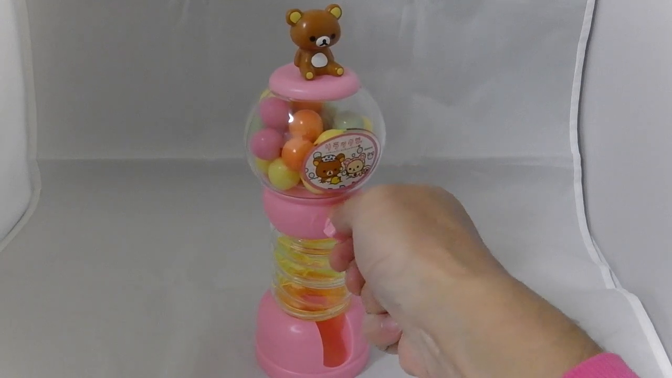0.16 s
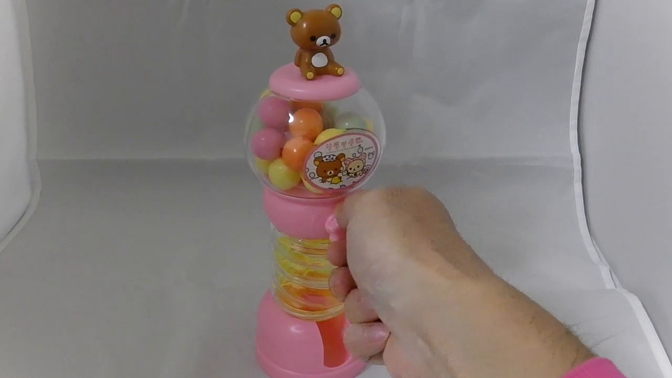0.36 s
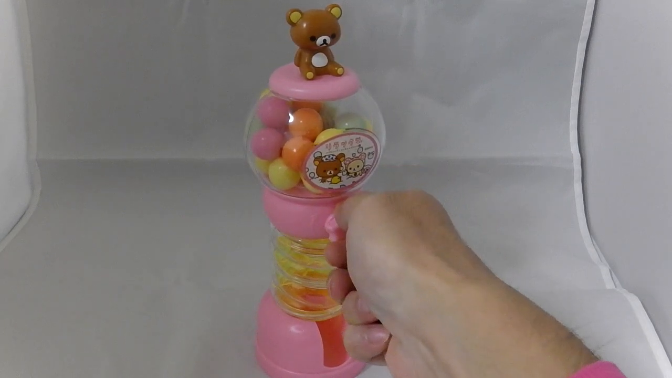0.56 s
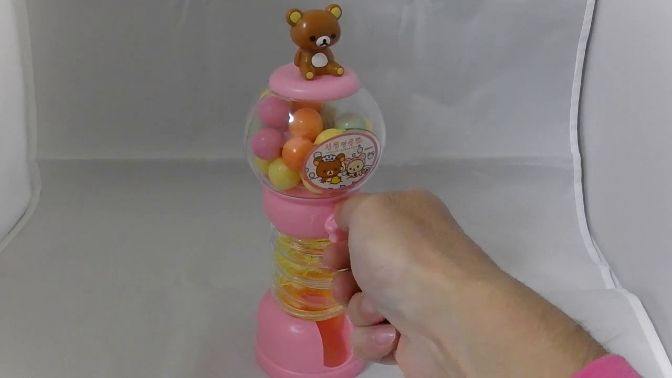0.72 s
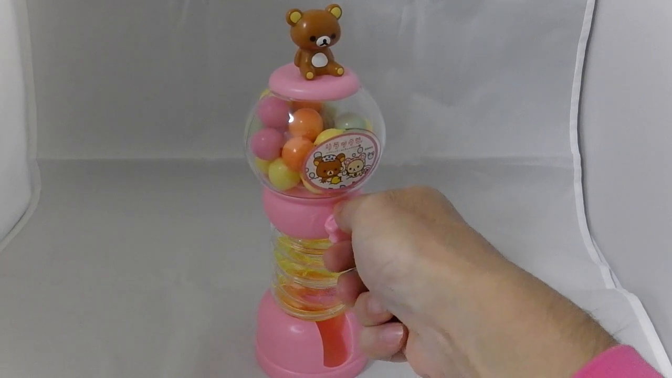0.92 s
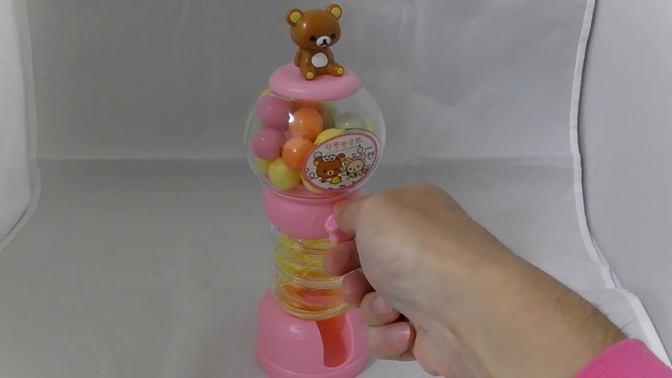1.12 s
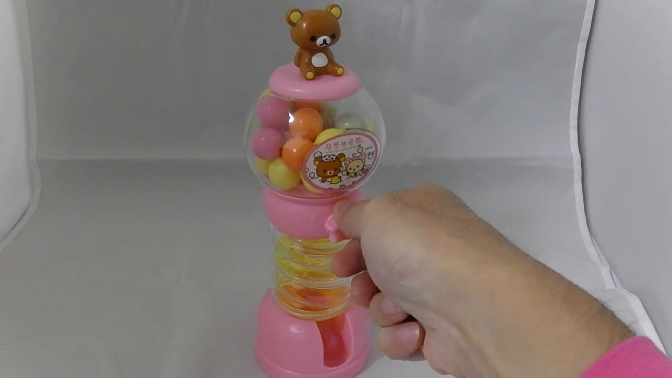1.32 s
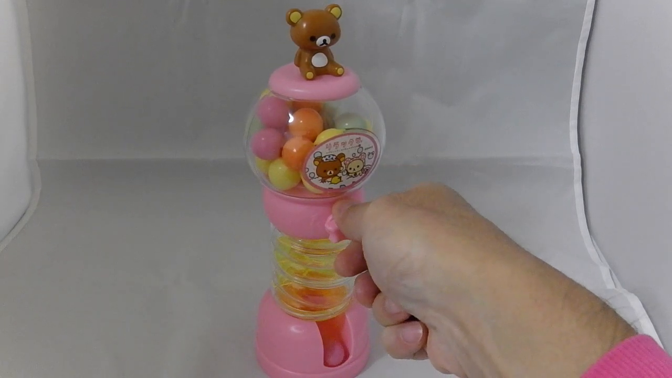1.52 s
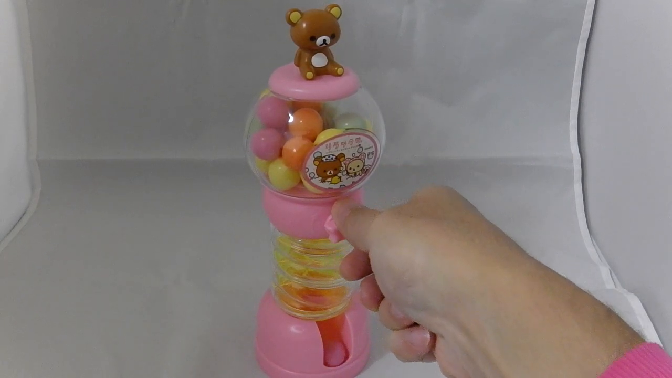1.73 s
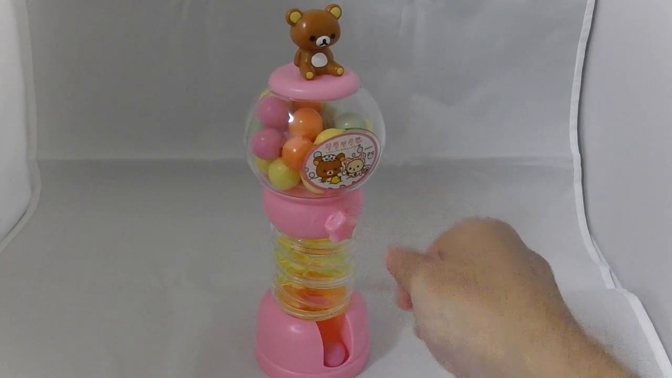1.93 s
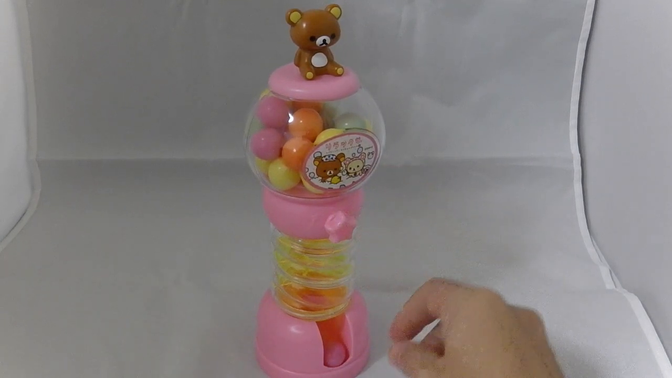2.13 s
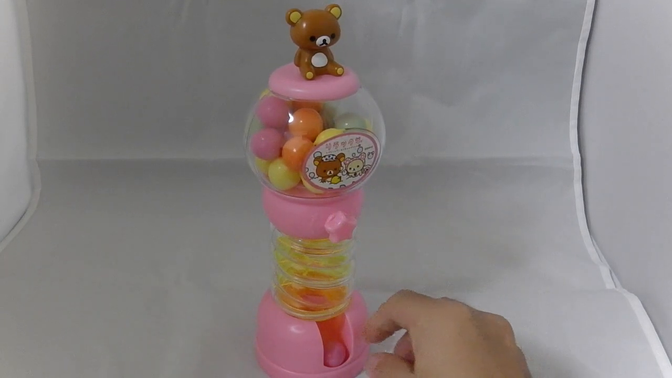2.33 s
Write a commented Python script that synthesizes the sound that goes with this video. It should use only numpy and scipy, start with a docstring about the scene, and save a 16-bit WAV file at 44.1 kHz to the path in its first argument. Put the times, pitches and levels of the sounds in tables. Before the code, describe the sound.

Hard plastic knob ratchets with loud clacks, then a small ball rattles down a hollow chute

```python
"""A hand turns the knob of a small plastic gumball toy on a table: ratchet and balls knock, then a ball
rolls rattling down the spiral chute and bounces out in the tray. Contact clicks ring the hollow base and
shell, crack in damped high bands and make the table top hum. Close walls answer with short echoes over
room tone and microphone noise. The recorder splits near 4 kHz and passes the lower part about 21 ms late."""
import sys
import numpy as np
from scipy import signal
from scipy.fft import rfft, irfft, next_fast_len
from scipy.io import wavfile
from scipy.ndimage import uniform_filter1d

SR = 44100
rng = np.random.default_rng(int(sys.argv[2]) if len(sys.argv) > 2 else 0)


def volts_from_decibels(level):
    """Turn decibel levels (scalar or array-like) into linear amplitude factors."""
    exponent = np.asarray(level, float) / 20
    return 10 ** exponent


def transcribe(u):
    """Save the signal u as a 16-bit wav file named by the first command-line argument.

    u: samples, shape (n,) or (channels, n), limited to [-1, 1]; the rate is SR.
    q: integer samples, one column per channel.
    """
    v = np.clip(np.atleast_2d(u).T, -1, 1)
    q = np.round(v * 32767).astype(np.int16)
    wavfile.write(sys.argv[1], SR, q)


N = 105840  # samples, 2.4 s

# Knocks of plastic on plastic. Each row: start in seconds, then relative levels in dB of the crack,
# the shell ring, the hollow knock and the table thud.
KNOCKS = [(0.032, -34, -34.5, -51, -53), (0.046, -31, -23, -21.5, -44), (0.062, -56, -55, -43, -48),
          (0.099, -68, -60, -37, -47), (0.138, -69, -66, -42.5, -66), (0.225, -38, -45, -39, -61),
          (0.2358, -10, -9.5, -14, -55.5), (0.252, -20, -15.5, -15.5, -43),
          (0.2731, -15.5, -15, -14, -47.5), (0.289, -18, -15.5, -22.5, -49), (0.32, -12, -15.5, -17, -48),
          (0.352, -13, -13, -15.5, -46), (0.38, -17.5, -17.5, -15.5, -59), (0.3975, -22, -15.5, -21, -67),
          (0.436, -41, -25.5, -27, -73), (0.452, -33.5, -30, -37, -54), (0.515, -42.5, -34, -30.5, -68),
          (0.536, -40, -33.5, -26, -65), (0.55, -31.5, -33, -30, -72), (0.575, -41.5, -22.5, -51, -71),
          (0.59, -47, -30, -52, -68), (0.605, -46.5, -31, -51, -57), (0.629, -24, -25, -45, -68),
          (0.644, -23, -25.5, -21, -63), (0.654, -28, -18.5, -37, -70), (0.661, -43, -26, -27.5, -64),
          (0.675, -25, -39, -23, -51), (0.69, -22.5, -20.5, -19, -54), (0.714, -41, -19, -43, -55),
          (0.737, -27, -20, -27.5, -58.5), (0.744, -21, -17, -22, -57), (0.765, -22.5, -12.5, -28, -52),
          (0.787, -27.5, -25.5, -23, -62), (0.838, -24, -19, -44.5, -64), (0.851, -23, -18, -23, -54),
          (0.869, -16, -9, -33, -54), (0.879, -30, -27, -16.5, -52.5), (0.928, -41, -15, -49, -53),
          (0.943, -12.5, -12, -23, -48.5), (0.959, -31, -31, -27, -64), (0.9803, -14.5, -17, -15, -51),
          (1.021, -22, -28.5, -18, -67.5), (1.029, -26.5, -43, -38, -55), (1.039, -23.5, -31, -53, -63.5),
          (1.0445, -20, -37, -25, -66.5), (1.052, -13, -17.5, -25, -58.5), (1.065, -21, -41, -54, -61.5),
          (1.1089, -21, -24, -25.5, -73.5), (1.125, -18, -25.5, -28, -56.5), (1.2036, -22, -34, -30, -58),
          (1.215, -38, -29, -36, -59), (1.23, -40, -20, -19.5, -51), (1.2338, -12.5, -1, -15.5, -40.5),
          (1.286, -30.5, -29, -34, -70), (1.315, -31.5, -39, -44, -53), (1.3234, -13, -6.5, -15.5, -39),
          (1.3657, -14.5, -15, -20.5, -46.5), (1.404, -19.5, -16, -23, -52.5),
          (1.437, -12.5, -10.5, -16, -46), (1.476, -21, -15, -18.5, -47),
          (1.5027, -27.5, -20.5, -23.5, -59), (1.519, -32.5, -28, -25, -48),
          (1.529, -44, -31.5, -29.5, -66), (1.629, -53, -36, -27.5, -63), (1.635, -40.5, -40, -39, -61),
          (1.703, -58, -68, -52.5, -64.5), (2.3288, -38, -40.5, -75, -58)]
KNOCK_S, CRACK_COLUMN, SHELL_COLUMN, HOLLOW_COLUMN, THUD_COLUMN = range(5)
# Rolling and rubbing between knocks. Each row: time in seconds, relative treble level in dB,
# relative body level in dB.
RUBBING = [(0, -71, -69), (0.028, -44, -46), (0.05, -39.5, -33), (0.09, -56.5, -46), (0.13, -61.5, -59),
           (0.2, -57.5, -57), (0.24, -42, -42), (0.42, -41.5, -35), (0.49, -49, -36), (0.6, -38, -33.5),
           (0.66, -31, -30), (0.8, -30, -26), (0.88, -30.5, -27), (0.92, -35, -27.5), (0.97, -22, -28.5),
           (1.01, -45, -44), (1.06, -18.5, -14.5), (1.09, -44.5, -42.5), (1.14, -35.5, -35.5),
           (1.19, -60, -53), (1.22, -37, -40), (1.28, -36, -34.5), (1.34, -42, -36), (1.5, -44.5, -37.5),
           (1.55, -44, -34), (1.6, -81.5, -70), (1.645, -49.5, -31), (1.69, -76.5, -65), (2.3, -69.5, -70),
           (2.35, -50, -57), (2.4, -65, -53)]
RUB_TREBLE_COLUMN, RUB_BODY_COLUMN = 1, 2
# Modes of the hollow base. Each row: frequency in Hz, relative level in dB, 60 dB decay in seconds.
HOLLOW_MODES = [(230, -39.5, 0.017), (341, -31.5, 0.099), (481.7, -17.5, 0.032), (621.3, -18, 0.057),
                (714.4, -16, 0.027), (870, -11.5, 0.023), (989, -17.5, 0.013), (1268, -13.5, 0.015),
                (1515, -10.5, 0.016), (1887, -4.5, 0.0067), (2076, -3, 0.011), (2320, -11.5, 0.0078)]
# Modes of the plastic shell. Each row: frequency in Hz, relative level in dB, 60 dB decay in seconds.
SHELL_MODES = [(2441, -9.5, 0.0097), (2912, -7.5, 0.011), (3012, -7.5, .03), (3210, -8.5, 0.013),
               (3396, -5.5, 0.028), (3800, -8.5, 0.012)]
# Spectrum of the crack. Each row: frequency in Hz, relative level per Hz in dB.
CRACK_SPECTRUM = [(3500, -10), (4500, 6), (5300, 3.5), (6400, 2.5), (8700, -1.5), (11000, 1.5), (14500, -4),
                  (16000, -12.5)]
# Left-right likeness of the crack. Each row: frequency in Hz, likeness from 0 to 1.
CRACK_ALIKE = [(3500, 0.93), (6800, 0.85), (15000, 0.15)]
# Modes of the table top. Each row: frequency in Hz, relative level in dB, 60 dB decay in seconds.
TABLE_MODES = [(91.5, -23.5, 0.12), (146, -5.5, 0.29)]
# Spectrum of room tone and microphone noise. Each row: frequency in Hz, relative level per Hz in dB.
HISS_SPECTRUM = [(18, -48.5), (30, -26), (86, -3.5), (165, -5.5), (210, -9), (336, -9), (801, -15),
                 (866, -14.5), (14000, -26.5), (16000, -34.5)]
# Left-right likeness of that noise. Each row: frequency in Hz, likeness from 0 to 1.
HISS_ALIKE = [(60, 0.61), (380, 0.97), (2380, 0.13), (15000, 0.13)]

# Each knock is a short chatter of contacts: time constant of the rise, hold, time constant of the fall.
RISE_S, HOLD_S, FALL_S = 0.00053, 0.0018, 0.0037
# Contact sizes spread by this many dB per unit of an exponential draw; force is even over EVEN_S.
BODY_CONTACTS_PER_S, BODY_CONTACT_SPREAD_DB = 5000, 7
CRACK_CONTACTS_PER_S, CRACK_CONTACT_SPREAD_DB = 12000, 2
EVEN_S = 0.0031
FIRST_DB, FIRST_S = 14, 0.00089  # hard contact: peak over the chatter's rms, delay into the knock
TICKS_PER_S, TICK_SPREAD_DB, RUB_SHARE = 110, 4.5, 1  # RUB_SHARE: steady rub over tick rms, a ratio
STRIKE_SPREAD_DB, CRACK_SPREAD_DB = 3, 3  # standard deviation of knock strength, per resonance or band
BODY_LOW_HZ, BODY_HIGH_HZ = 214, 3640  # band the body radiates
BODY_SIDE_DB, SIDE_DB_PER_OCTAVE = -36.5, -11  # side over mid from 1 kHz up; the side grows below
TABLE_LOW_HZ, TABLE_SIDE_DB, TABLE_SIDE_LAG_S = 70, -20.5, 0.002
ROOM_T60_S, ROOM_CUT_HZ, ROOM_DB = 0.1, 9400, -16.5  # decay at low frequency, where it shortens, gain
ROOM_WIDE_HZ = 3010  # well below this both channels share one room sound
HISS_DB = -56.5  # rms over both channels, re full scale
SPLIT_HZ, LOW_DELAY_S, CUTOFF_HZ = 4170, 0.0215, 16300


def rms_one(x):
    """Scale a signal to unit rms."""
    return x / np.sqrt(np.mean(x ** 2) + 1e-20)


def marks_at(seconds, strengths):
    """Single-sample impulses at the given times."""
    marks = np.zeros(N)
    marks[(seconds * SR).astype(int)] = strengths
    return marks


def bursts(marks):
    """Each mark opens an envelope that rises, holds and falls."""
    t = np.arange(int(0.03 * SR)) / SR
    rise = 1 - np.exp(-t / RISE_S)
    fall = np.exp(-np.maximum(t - HOLD_S, 0) / FALL_S)
    return np.abs(signal.oaconvolve(marks, rise * fall)[:N])


def contacts(per_s, spread_db):
    """Dense uneven contact clicks that share out a steady force; rms 1."""
    sizes = volts_from_decibels(spread_db * np.minimum(rng.exponential(1, N), 4)) * rng.choice([-1, 1], N)
    clicks = sizes * (rng.random(N) < per_s / SR)
    local_power = np.abs(uniform_filter1d(clicks ** 2, int(EVEN_S * SR)))
    return rms_one(clicks / np.sqrt(local_power + 0.01))


def hard_contacts():
    """One clean click early in each knock, pushing either way."""
    starts = np.array(KNOCKS)[:, KNOCK_S]
    return marks_at(starts + FIRST_S, volts_from_decibels(FIRST_DB) * rng.choice([-1, 1], len(starts)))


def rolling():
    """Envelope of the rolling ball: steady rub plus random small ticks; rms 1."""
    tick_sizes = volts_from_decibels(TICK_SPREAD_DB * rng.standard_normal(N))
    ticks = tick_sizes * (rng.random(N) < TICKS_PER_S / SR)
    return rms_one(RUB_SHARE + rms_one(bursts(ticks)))


def force(knock_column, rub_column, spread_db, roll):
    """Envelope of the force on one resonance: knocks of varied strength over the rolling."""
    knocks, rubbing = np.array(KNOCKS), np.array(RUBBING)
    strengths_db = knocks[:, knock_column] + spread_db * rng.standard_normal(len(knocks))
    marks = marks_at(knocks[:, KNOCK_S], volts_from_decibels(strengths_db))
    rub_level = volts_from_decibels(np.interp(np.arange(N) / SR, rubbing[:, 0], rubbing[:, rub_column]))
    return np.hypot(bursts(marks), rub_level * roll)


def mode(drive, hz, t60):
    """A damped two-pole resonance that passes white noise at about unit power."""
    r, w = volts_from_decibels(-60 / (t60 * SR)), 2 * np.pi * hz / SR
    gain = np.sin(w) * np.sqrt(2 * (1 - r * r))
    return signal.lfilter([0, gain], [1, -2 * r * np.cos(w), r * r], drive + 1e-18)


def body(roll):
    """Shell and hollow base ring in their modes, neighbours in opposite phase."""
    out, hard = np.zeros((2, N)), hard_contacts()
    for column, modes in ((SHELL_COLUMN, SHELL_MODES), (HOLLOW_COLUMN, HOLLOW_MODES)):
        touch = contacts(BODY_CONTACTS_PER_S, BODY_CONTACT_SPREAD_DB) + hard
        for k, (hz, db, t60) in enumerate(modes):
            sign = (-1) ** k
            drive = touch * force(column, RUB_BODY_COLUMN, STRIKE_SPREAD_DB, roll)
            ring = sign * volts_from_decibels(db) * mode(drive, hz, t60)
            octaves = min(np.log2(hz / 1000), 0)
            side = sign * volts_from_decibels(BODY_SIDE_DB + SIDE_DB_PER_OCTAVE * octaves)
            out += ring * (1 + side * np.array([[1], [-1]]))
    radiated = signal.butter(4, [BODY_LOW_HZ, BODY_HIGH_HZ], "band", fs=SR, output="sos")
    return signal.sosfilt(radiated, out)


def at_hz(points, hz):
    """Read a curve along log frequency."""
    points = np.array(points)
    return np.interp(np.log(hz), np.log(points[:, 0]), points[:, 1])


def pair(mid, side, alike):
    """Left and right from a shared and an unshared part."""
    alike = np.clip(alike, 0, 1)
    return np.sqrt((1 + alike) / 2) * mid + np.sqrt((1 - alike) / 2) * side * [[1], [-1]]


def stereo_band(drive, low, high, spectrum, likeness):
    """Filter a mid and a side noise to one band, with the level and width read at its centre."""
    hz = np.sqrt(low * high)
    band = signal.butter(2, [low, high], "band", fs=SR, output="sos")
    mid, side = signal.sosfilt(band, drive)
    return volts_from_decibels(at_hz(spectrum, hz)) * pair(mid, side, at_hz(likeness, hz))


def crack(touch, other, roll):
    """The brittle top of each contact, in quarter-octave bands too damped to ring."""
    out, edges = 0, 3400 * 2 ** np.arange(0, 2.4, 0.25)
    for k, (low, high) in enumerate(zip(edges, edges[1:])):
        push = force(CRACK_COLUMN, RUB_TREBLE_COLUMN, CRACK_SPREAD_DB, roll)
        drive = (-1) ** k * np.array([touch, other]) * push
        out = out + stereo_band(drive, low, high, CRACK_SPECTRUM, CRACK_ALIKE)
    return out


def table():
    """Each knock pushes the table top through the toy's base, and its modes hum."""
    knocks = np.array(KNOCKS)
    push = bursts(marks_at(knocks[:, KNOCK_S], volts_from_decibels(knocks[:, THUD_COLUMN])))
    hum = sum(volts_from_decibels(db) * mode(push, hz, t60) for hz, db, t60 in TABLE_MODES)
    side = volts_from_decibels(TABLE_SIDE_DB) * np.roll(hum, int(TABLE_SIDE_LAG_S * SR))
    hum = hum + side * np.array([[1], [-1]])
    return signal.sosfilt(signal.butter(4, TABLE_LOW_HZ, "high", fs=SR, output="sos"), hum)


def room(x):
    """Close walls: ten feedback delays a side, duller on every round."""
    size = next_fast_len(N + SR // 2)
    hz = np.arange(size // 2 + 1) * SR / size
    t60 = ROOM_T60_S / np.sqrt(1 + (hz / ROOM_CUT_HZ) ** 2)
    wet = np.zeros((2, len(hz)), complex)
    for k, lag in enumerate(rng.uniform(0.0025, 0.015, 20)):  # seconds; paths of about 1 to 5 m
        loop = volts_from_decibels(-60 * lag / t60) * np.exp(-2j * np.pi * hz * lag)
        wet[k % 2] += (-1) ** (k // 2) * loop / (1 - loop)
    wide = 1 / (1 + (ROOM_WIDE_HZ / (hz + 1)) ** 2)
    shared = wet.mean(axis=0)
    wet = shared + wide * (wet - shared)
    return irfft(rfft(x, size) * wet, size)[:, :N]


def hiss():
    """Room tone and microphone noise: white noise shaped in half-octave bands."""
    out, edges = 0, 25 * 2 ** np.arange(0, 9.6, 0.5)
    white = rng.standard_normal((2, 2, N))  # neighbouring bands take separate noise
    for k, (low, high) in enumerate(zip(edges, edges[1:])):
        out = out + stereo_band(white[k % 2], low, high, HISS_SPECTRUM, HISS_ALIKE)
    return volts_from_decibels(HISS_DB) * rms_one(out)


def scene():
    """The toy on its table, the answer of the walls, and the noise behind them."""
    roll = rolling()
    fine = [contacts(CRACK_CONTACTS_PER_S, CRACK_CONTACT_SPREAD_DB) for _ in range(2)]
    toy = body(roll) + crack(*fine, roll) + table()
    return toy + volts_from_decibels(ROOM_DB) * room(toy.mean(axis=0)) + hiss()


def band_limit(x):
    """A steep low-pass at the top of the band."""
    return signal.sosfilt(signal.butter(12, 16430, fs=SR, output="sos"), x)


def record(dry):
    """The band under the split arrives late; peaks clip, the top is cut."""
    low = signal.sosfilt(signal.butter(8, SPLIT_HZ, fs=SR, output="sos"), dry)
    high = signal.sosfilt(signal.butter(8, SPLIT_HZ, "high", fs=SR, output="sos"), dry)
    lag = int(LOW_DELAY_S * SR)
    lead_in = low[:, lag:0:-1]  # the opening, mirrored, fills the wait
    late_low = np.concatenate([lead_in, low[:, :N - lag]], axis=1)
    clipped = np.clip(high + late_low, -1, 1)
    top_cut = signal.cheby2(12, 60, CUTOFF_HZ, fs=SR, output="sos")  # 60 dB down from CUTOFF_HZ
    mix = signal.sosfilt(top_cut, clipped)
    return band_limit(mix)


dry = scene()
out = record(dry)
transcribe(out)
```